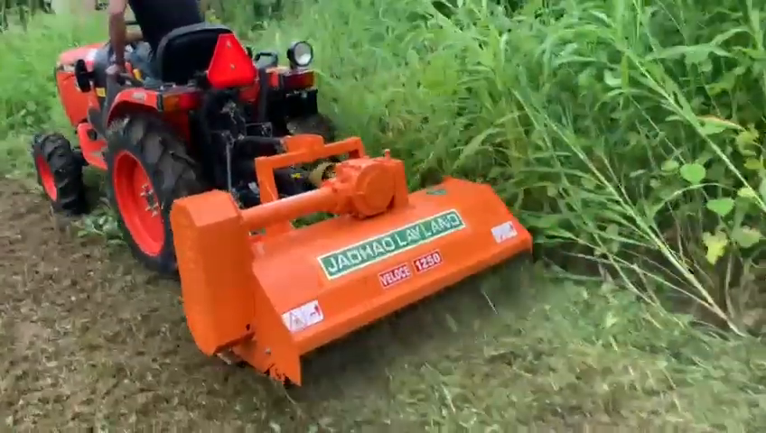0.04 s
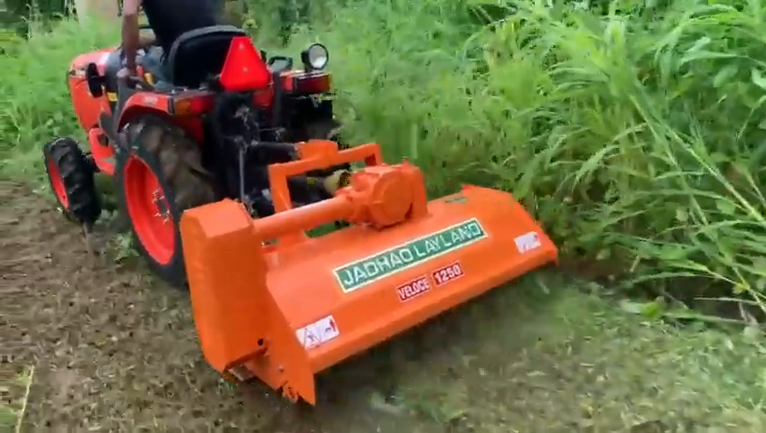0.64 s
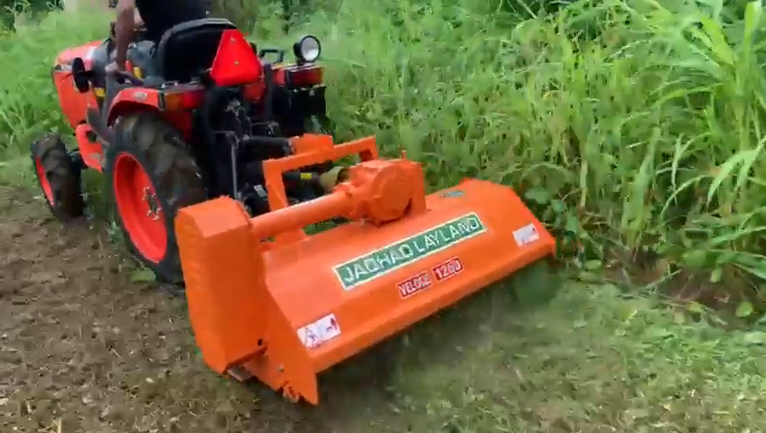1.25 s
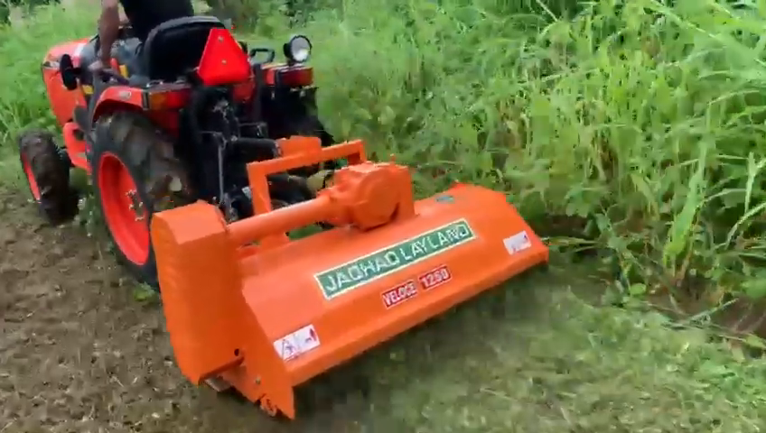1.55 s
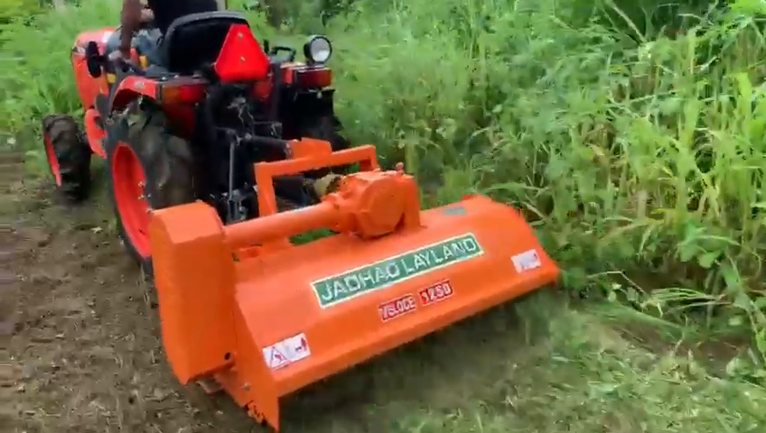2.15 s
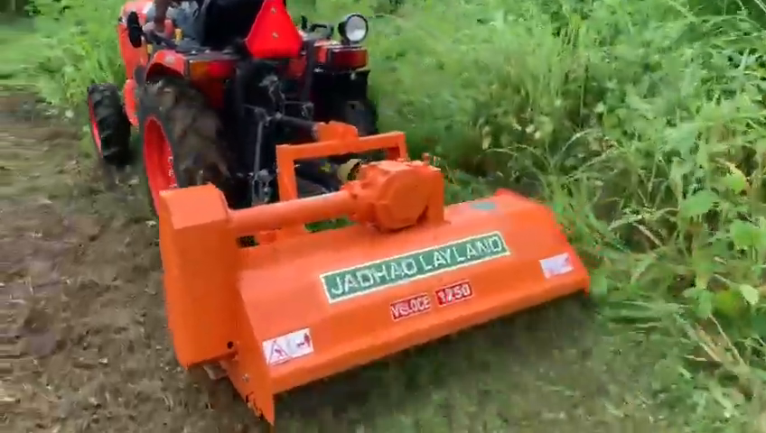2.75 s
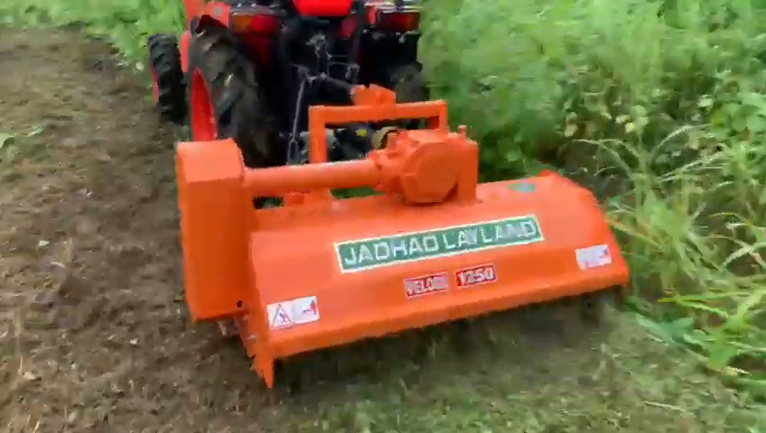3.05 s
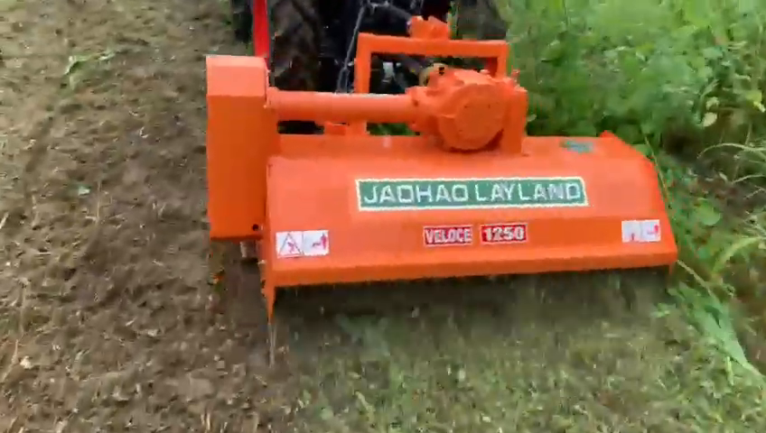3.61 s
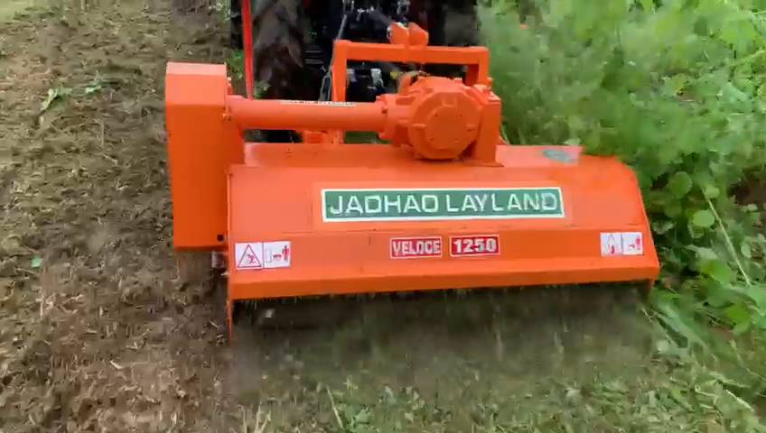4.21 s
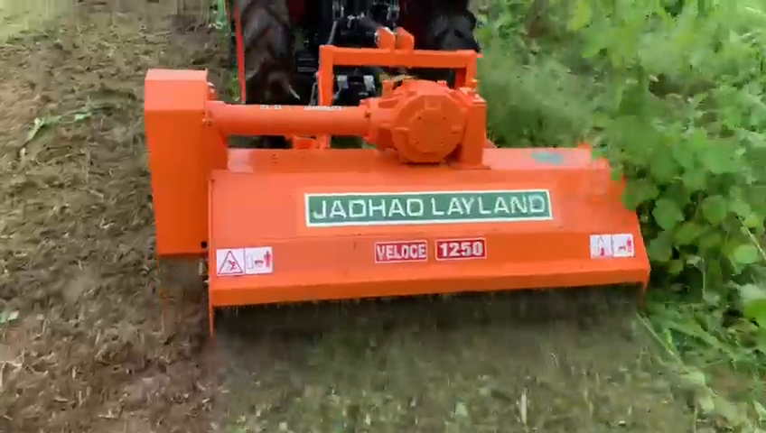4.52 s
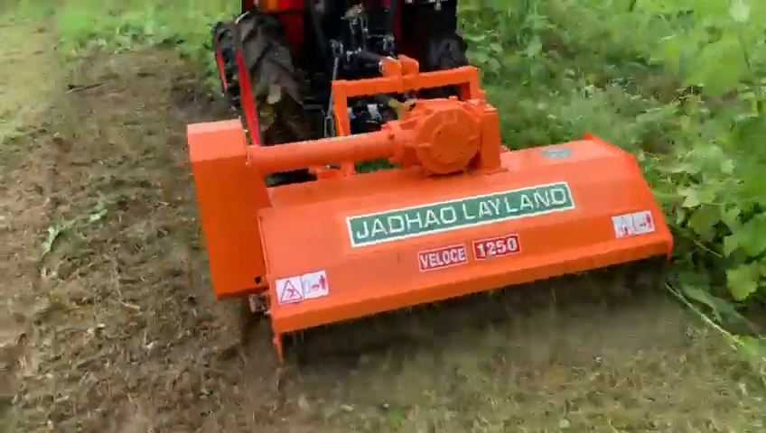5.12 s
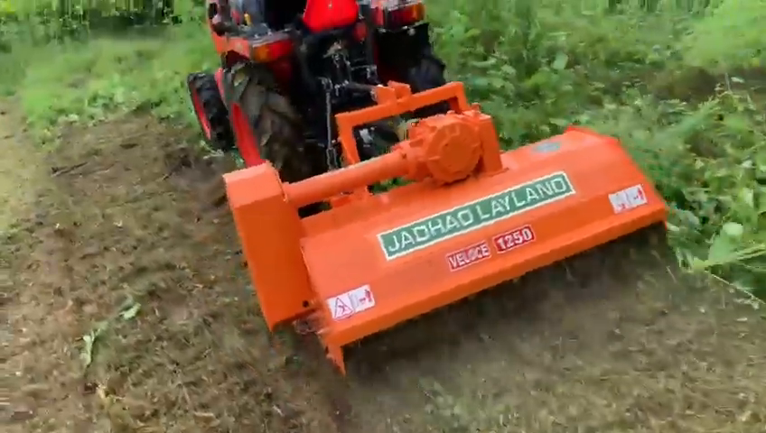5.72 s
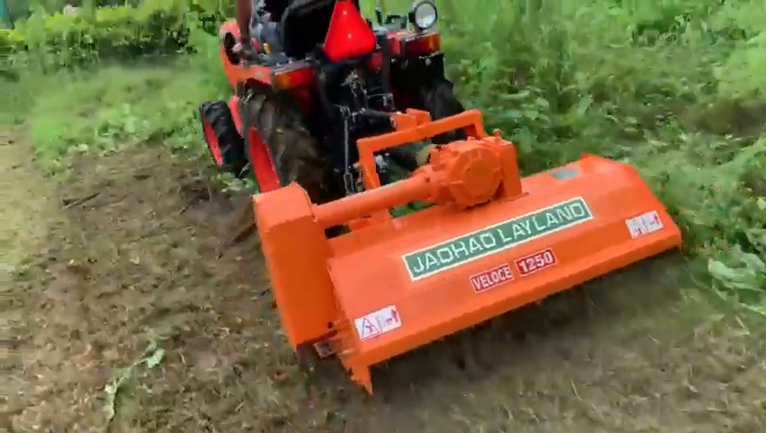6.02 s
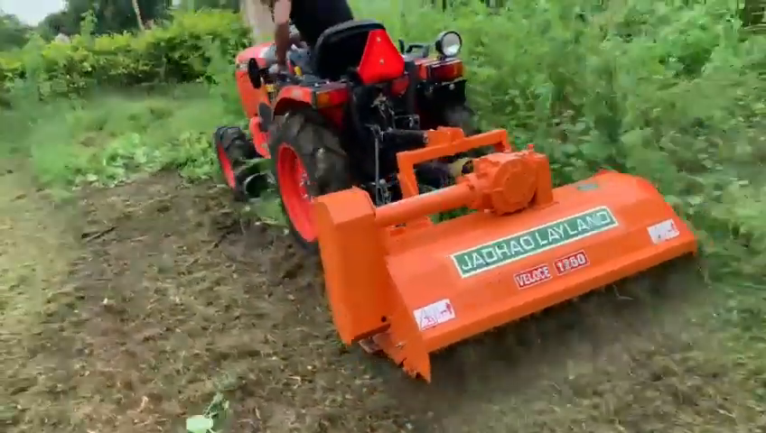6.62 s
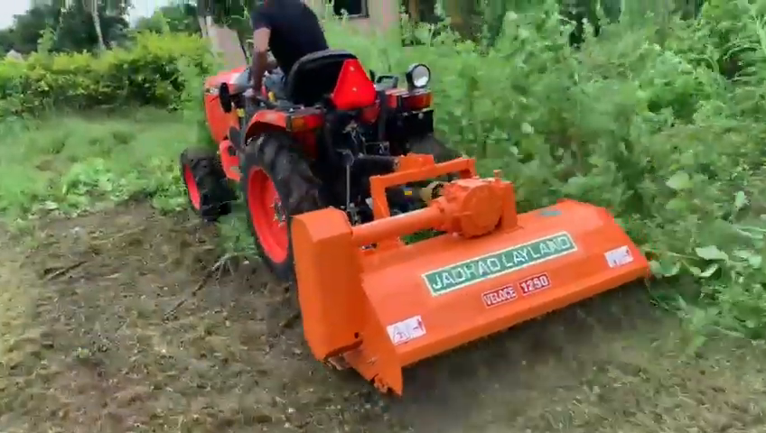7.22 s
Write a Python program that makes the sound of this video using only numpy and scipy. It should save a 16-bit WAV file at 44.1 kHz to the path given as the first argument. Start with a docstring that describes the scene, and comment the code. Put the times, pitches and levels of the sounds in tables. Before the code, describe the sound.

Close by in a field, a flail mower hums and rattles over the steady drone of a diesel tractor. It starts in thick grass, with constant chopping, crunching stalks and sharp ticks on metal, then thins to a lighter leafy hiss. In the last two seconds, a few hollow knocks of earth hit the hood as gusts rumble and thump on the microphone and the machine keeps running.

```python
"""A field of tall grass, a few metres from a small diesel tractor driving a flail mulcher.
Four rows of flails hum under a steel hood, snapping stems and tearing leaves; stalks, stones and clods
strike the steel. The exhaust throbs and the gearbox sings, both geared to the rotor's speed.
In the last two seconds wind buffets the two microphone ports and the drone wavers between them."""
import sys
import numpy as np
from scipy import signal
from scipy.fft import rfft, irfft, next_fast_len
from scipy.io import wavfile
from scipy.ndimage import uniform_filter1d

SR = 44100
rng = np.random.default_rng(int(sys.argv[2]) if len(sys.argv) > 2 else 0)


def dump_mix(stems):
    """Bounce the given channels to the path in sys.argv[1] as a 16-bit WAV at rate SR."""
    frames = np.atleast_2d(stems).T  # one column per channel
    limited = np.clip(frames, -1, 1)  # hard clip at full scale
    pcm = np.round(limited * 32767).astype(np.int16)
    wavfile.write(sys.argv[1], SR, pcm)


N = 320166
TIME = np.arange(N) / SR
FREQS = np.maximum(np.fft.rfftfreq(N, 1 / SR), 1)

# the steel hood's ring under flying stems (pitch [Hz], width [Hz], level [dB])
HOOD_MODES = [(1190, 310, 0), (1338, 120, -1), (1765, 105, 0.5), (1924, 83, -1.5), (2050, 420, -3),
              (2705, 72, -9), (3160, 240, -8.5), (3530, 460, -6), (4630, 250, -9.5)]
# tone colour of snapping stems (frequency [Hz], level [dB])
STEM_COLOUR = [(250, -11), (700, 4), (1000, -5.5), (1300, -3.5), (1900, -1), (2400, 0.5), (3000, -3.5),
               (3900, -5.5), (5400, -6), (7400, -11), (12000, -96)]


def flails(turns, hum_db, drum_db):
    """Four rows of flails push the air four times a turn, a low hum, and drum on the grass."""
    # partials of the drumming (multiple of the rotor rate, level [dB])
    drum_partials = [(2, -4.5), (3, 0.5), (9, -3.5), (10, -8.5), (11, -10), (13, -12.5), (14, -12.5),
                     (15, -13)]
    hum = np.sqrt(2) * np.sin(2 * np.pi * 4 * turns) * undb(hum_db + 0.3 * walk(7))
    return hum + tones(turns, drum_partials, flutter=0.11) * undb(drum_db)


def casing(turns):
    """Rotor overtones, gear hum and belt rasp radiate from the casing, whose walls growl once a turn."""
    # overtones of unevenly worn rows (multiple of the rotor rate, level [dB])
    worn_rows = [(7, -15), (8, -2.5), (12, -12.5), (20, -23)]
    # gear teeth meshing (multiple of the rotor rate, level [dB])
    gear_mesh = [(6.17, -22), (8.31, -2), (18.52, -25.5)]
    # rasp of the belt drive (multiple of the rotor rate, level [dB])
    belt_rasp = [(8.91, -14), (10.86, -17.5), (12.87, -24.5), (17.82, -27), (24.66, -22.5), (25.75, -21.5),
                 (26.73, -22)]
    # wall resonances (pitch [Hz], width [Hz], level per pass [dB])
    walls = [(362.6, 64, 3.5), (498, 86, 1.5)]
    belt_turns = turns + 0.0055 * walk(34)  # the belt slips back and forth, blurring its partials
    drone = tones(turns, worn_rows, flutter=0.15) + tones(turns, gear_mesh, flutter=0.082)
    rasp = tones(belt_turns, belt_rasp, flutter=0.2)
    growl = ring(ring(noise() * stroke(turns, sharpness=1), walls), walls)
    return drone + rasp + undb(-8.5) * spread(growl)


def hood_roar(turns, roar_db):
    """Air and clippings churn under the hood; loose flails rattle much the same way on every turn."""
    # dark body of the roar (frequency [Hz], level [dB])
    roar_colour = [(20, -9), (45, -4), (70, 1), (110, 1.5), (175, 4), (250, 1), (380, -0.5), (540, -2),
                   (780, -8.5), (1000, -9), (1500, -8), (3000, -58)]
    churn = colour(noise() * stroke(turns, sharpness=0.16), roar_colour)
    one_turn = rng.standard_normal(256)
    looped = np.interp(turns % 1, np.arange(256) / 256, one_turn)
    rattle = colour(looped * undb(2 * walk(6.4)), roar_colour)
    return (spread(churn) + undb(-14.5) * rattle) * undb(roar_db)


def grass():
    """Grass feeds in by tufts: its flow, the extra roar and the extra hiss, all in dB."""
    # the grass thins as the tractor turns out of the tall stand (time [s], flow [dB])
    stand = [(0, 0.6), (1.0, 1.16), (1.9, -0.6), (2.3, -3.5), (3.3, -6.5), (4.0, -8), (5.5, -4), (6.15, -3),
             (6.8, -7), (7.15, -5), (7.26, -3.5)]
    # thick tufts load the hood, leafy ones hiss
    # (time [s], half length [s], extra flow [dB], extra roar [dB], extra hiss [dB])
    tufts = [(0.22, 0.096, 1.8, 1, -1), (0.54, 0.24, 1, -0.5, 1), (1.06, 0.2, 2.5, 1.5, 1),
             (1.47, 0.058, 2.5, 2, 0), (1.804, 0.19, 4, 1.5, 0), (2.15, 0.093, 4.5, 3.5, 0.5),
             (2.537, 0.19, 4, 3.5, 2), (3.038, 0.22, 4, 2, 1), (3.607, 0.32, 3, 1, 4.5),
             (4.263, 0.3, 0.5, 1, 3), (5.79, 0.027, 4, -11, -1), (6, 0.11, 2.5, 14, 2.2)]
    stand_db, = curves(stand)
    tuft_db, load_db, leaf_db = sum(np.outer(dbs, bell(s, half_s)) for s, half_s, *dbs in tufts)
    return stand_db + tuft_db, load_db + 0.45 * walk(4.2), leaf_db


def cutting(turns, chop_db, shred_db):
    """The flails snap stems and tear leaves, pulsing gently once, twice and four times a turn."""
    # bright hiss of tearing leaves (frequency [Hz], level [dB])
    leaf_colour = [(1500, -9.5), (4000, -5), (5500, -5), (7300, 1), (7800, 0), (8100, 3.5), (11200, 1.5),
                   (11700, -2), (13000, -30)]
    bite = stroke(turns, 0.026) * stroke(2 * turns, 0.037) * stroke(4 * turns, 0.018)
    feed = bite * undb(0.3 * walk(14))
    stems = colour(snaps(per_s=16000, scatter_db=1) * feed, STEM_COLOUR)
    panels = 0
    for hz, width, db in HOOD_MODES:  # stems land all over the hood, so each mode is struck on its own
        gain = undb(db + 2 * walk(21))
        panels += gain * ring(snaps(per_s=2000, scatter_db=1) * feed, [(hz, width, 0)])
    chop = ground_echo(undb(-4) * stems + undb(-6) * unit(panels), lag_s=0.0032, share=0.47)
    leaves = colour(snaps(per_s=16000, scatter_db=1.5) * feed, leaf_colour)
    return spread(flicker(chop * undb(chop_db) + leaves * undb(shred_db), depth_db=1.61))


def engine(firings, exhaust_db, flow_db):
    """The exhaust throbs at the firing rate, harder under load; each combustion rattles the block."""
    # the exhaust note (multiple of the firing rate, level [dB])
    exhaust_partials = [(1, -3), (2, -3), (3, -16), (4, -10.5), (6, -25.5)]
    # resonances of the engine block (pitch [Hz], width [Hz], level [dB])
    block_modes = [(1184, 100, 35), (1860, 320, -14), (2500, 260, -19)]
    bark = undb(0.73 * uniform_filter1d(flow_db, SR))  # load is the grass flow averaged over a second
    throb = tones(firings, exhaust_partials[:1], flutter=0.049)
    overtones = tones(firings, exhaust_partials[1:], flutter=0.16)
    clatter = ring(noise() * stroke(firings, sharpness=0.81), block_modes)
    return (throb + bark * overtones) * undb(exhaust_db) + undb(-49) * spread(clatter)


def stalks(decay_s):
    """Thick stalks burst in short crackles against the steel."""
    # stalk hits (time [s], relative level [dB])
    hits = [(.5522, -27), (0.9485, -30), (1.158, -20.5), (1.457, -24), (1.5, -26), (1.708, -24),
            (1.731, -26), (1.838, -23), (1.89, -17.5), (2.073, -22), (2.104, -33), (2.152, -26),
            (2.406, -26), (2.553, -28), (2.612, -26), (3.546, -20.5), (4.177, -27), (5.875, -22.5),
            (5.984, -28), (6.033, -24.5)]
    bursts = sum(undb(db) * strike(s, decay_s) for s, db in hits)
    crackle = snaps(per_s=5700, scatter_db=3.5)
    crunch = unit(ring(crackle, HOOD_MODES) + undb(-13) * colour(crackle, STEM_COLOUR))
    return spread(bursts * crunch) * undb(-2)


def bundles():
    """Bundles of stalks drag along one hood panel each: swells of narrow, ringing noise."""
    # scrapes (time [s], panel pitch [Hz], half length [s], level [dB])
    scrapes = [(1.11, 1230, 0.085, -32), (1.48, 1296, 0.023, -27.5), (1.82, 438, 0.14, -27),
               (1.87, 622, 0.52, -34), (3.56, 538, 0.037, -27), (5.765, 513, 0.012, -23),
               (6.035, 1300, 0.011, -32)]
    out, panel_q = 0, 66
    for s, hz, half_s, db in scrapes:
        shape = bell(s, half_s)
        scrape = shape * ring(rng.standard_normal(N), [(hz, hz / panel_q, 0)])
        out += undb(db) * scrape * np.std(shape) / np.std(scrape)
    return out


def clods(decay_s, crack_db):
    """Clods of earth crack against the hood, which answers with a short, hollow knock."""
    # knocks (time [s], level [dB])
    knocks = [(5.664, -19), (5.688, -14.5), (5.987, -28), (6.123, -13.5), (6.616, -19)]
    # dull crumble of earth (frequency [Hz], level [dB])
    earth_colour = [(60, -20), (250, 8), (800, 2.5), (3000, -32)]
    # the hood's deep modes (pitch [Hz], width [Hz], level [dB])
    deep_modes = [(130, 41, 6), (280, 73, 19), (410, 100, 14), (535, 55, 11), (654, 76, 6), (790, 52, -4)]
    out = 0
    for s, db in knocks:
        crumble = strike(s, decay_s)
        earth = colour(crumble * rng.standard_normal(N), earth_colour)
        out += undb(db) * (ring(earth, deep_modes) + undb(crack_db) * earth) * np.std(crumble)
    return out


def stones(decay_s):
    """A flung stone or hard bit of stem pings one panel, which the wet grass damps at once."""
    # pings (time [s], panel pitch [Hz], level [dB])
    pings = [(0.088, 2190, -19), (0.318, 3830, -23), (0.548, 2180, -21), (1.015, 3720, -32),
             (1.067, 4670, -31), (1.108, 3680, -28), (1.198, 3650, -25), (1.775, 3000, -22),
             (1.848, 4100, -25), (1.889, 1720, -22), (2.078, 1400, -23), (2.2, 3960, -24),
             (2.408, 1570, -22), (2.554, 1440, -17.5), (2.615, 2020, -21), (5.951, 2330, -20),
             (6.014, 2260, -24), (6.186, 685, -23)]
    out = 0
    for s, hz, db in pings:
        age = np.maximum(TIME - s, 0)
        out += undb(db) * np.exp(-age / decay_s) * np.sin(2 * np.pi * hz * age)
    return out


def splinters(per_s, low_hz, high_hz, decay_s, scatter_db):
    """Woody splinters tick all over the hood, each with a brief ring at its own pitch."""
    out, age = np.zeros((2, N)), TIME[:SR // 25]
    for when, pitch, size, side in rng.random((int(per_s * N / SR), 4)):
        start = int(when * (N - len(age)))
        hz = low_hz * (high_hz / low_hz) ** pitch
        tick = np.exp(-age / decay_s) * np.sin(2 * np.pi * hz * age)
        gain = undb(scatter_db * size ** 2) * np.sqrt(low_hz / hz)
        out[int(2 * side), start:start + len(age)] += gain * tick
    return spread(unit(out))


def gearbox(turns, cycles_per_turn):
    """The gearbox sings one thin, wavering note that comes and goes as the microphone moves round it."""
    # fader ride of the whine (time [s], level [dB])
    whine_ride = [(0, -44), (1.7, -43), (2.3, -62), (3.3, -55), (3.7, -41), (4.65, -46), (5.05, -43),
                  (5.7, -35), (5.85, -53), (6.55, -38), (6.95, -46)]
    whine_db, = curves(whine_ride)
    return tones(turns + 0.004 * walk(14), [(cycles_per_turn, 0)], flutter=0.26) * undb(whine_db)


def wind_strength(start_s, rise_s, breeze_db):
    """Calm, then a breeze gets up and stays, with gusts on top; in dB."""
    # gusts (time [s], half length [s], strength [dB])
    gust_cues = [(5.5, 0.1, -15), (5.672, 0.047, -14), (6.133, 0.25, -21.5), (6.586, 0.047, -19.5),
                 (6.745, 0.087, -17), (7.147, 0.074, -22.5)]
    breeze = undb(breeze_db) * (1 + np.tanh((TIME - start_s) / rise_s)) / 2
    gusts = sum(undb(db) * bell(s, half_s) for s, half_s, db in gust_cues)
    return 20 * np.log10(np.hypot(breeze, gusts) + 1e-6)


def wind(wind_db):
    """Small eddies hit each port on its own, wide ones cover both; a few big ones thump."""
    # rumble of wind on the ports (frequency [Hz], level [dB])
    rumble_colour = [(20, -32), (45, -3), (75, -2.5), (150, 2), (220, -4), (300, -14), (700, -23.5),
                     (1500, -23.5), (4000, -78)]
    # big eddies, a few swings of pressure each (time [s], pitch [Hz], half length [s], level [dB])
    buffets = [(5.413, 80, 0.03, -20), (5.5, 206, 0.031, -19), (5.566, 75, 0.053, -31),
               (5.676, 140, 0.016, -14), (5.874, 78, 0.036, -24), (5.983, 117, 0.015, -23),
               (6.188, 150, 0.0097, -13), (6.32, 93.5, 0.013, -16), (6.697, 70.1, 0.012, -16),
               (6.912, 82, 0.013, -15)]
    small = noise() * undb(2 * np.array([walk(25), walk(28.2)]))
    wide = rng.standard_normal(N) * undb(3.4 * walk(15))
    thumps = sum(undb(db) * bell(s, half_s) * np.sin(2 * np.pi * (hz * TIME + rng.random()))
                 for s, hz, half_s, db in buffets)
    return colour(small + 0.55 * wide, rumble_colour) * undb(wind_db - 2) + thumps


def windblown(drone, wind_db):
    """In the wind the drone wavers at each port and briefly swings wide, left ahead of right."""
    # stereo swings (time [s], half length [s], phase lead of the left side [rad])
    swings = [(5.723, 0.14, 2), (5.93, 0.094, 1.33), (6.87, 0.07, 1.5)]
    lead = sum(radians * bell(s, half_s) for s, half_s, radians in swings)
    analytic = signal.hilbert(drone, next_fast_len(N))[:, :N]
    widened = np.real(analytic * np.exp(1j * np.array([lead, -lead]) / 2))
    waver = 1 + undb(wind_db + 12.5) * np.array([walk(34), walk(41)])
    return widened * waver


def ground_echo(x, lag_s, share):
    """Sound also arrives off the ground; the path drifts as the microphone moves."""
    late = TIME - lag_s * (1 + 0.0936 * walk(1.67))
    return unit(x + share * np.array([np.interp(late, TIME, port) for port in x]))


def flicker(x, depth_db):
    """Six octave-spaced bands swell and fade, each on its own."""
    spectrum, out = rfft(x), 0
    octaves = np.clip(np.log2(FREQS), 9, 14)
    for centre in range(9, 15):
        band = np.maximum(1 - np.abs(octaves - centre), 0)
        out += irfft(spectrum * band, N) * undb(depth_db * walk(18))
    return out


def spread(pair):
    """Turn two unrelated sounds into left and right of one wide source."""
    # left-right likeness; the hiss at 8-9 kHz is in opposite phase and sounds very wide
    # (frequency [Hz], correlation [-1 to 1])
    likeness = [(280, 0.98), (450, 0.82), (700, 0.72), (1050, 0.65), (1300, 0.77), (1700, 0.1), (2150, 0.5),
                (2900, 0.15), (4150, 0.739), (5200, -0.45), (5600, -0.45), (6400, 0.687), (7300, 0.097),
                (7700, -0.8), (8100, -1), (9050, -1), (9750, 0.011), (10400, 0.99)]
    alike = np.clip(over_hz(likeness), -1, 1)
    mid, side = rfft(pair) * np.sqrt([1 + alike, 1 - alike])
    return irfft(np.array([mid + side, mid - side]), N) / np.sqrt(2)


def tones(phase, partials, flutter):
    """Partials on multiples of a shaft's phase; the weaker ones flutter more for their size."""
    out = 0
    for multiple, db in partials:
        carrier = np.exp(2j * np.pi * (multiple * phase + rng.random()))
        wobble = flutter * undb(db / 2) * (walk(7.2) + 1j * walk(29))
        out += np.real(carrier * (undb(db) + wobble))
    return np.sqrt(2) * out


def snaps(per_s, scatter_db):
    """Dense tiny breaks of very uneven size."""
    hit = rng.random((2, N)) < per_s / SR
    return unit(hit * noise() * undb(scatter_db * rng.standard_normal(N)))


def ring(x, modes):
    """Pass a sound through resonances (pitch [Hz], width [Hz], level [dB]); rms 1."""
    response = sum(undb(db) / (1 + 1j * (FREQS ** 2 - hz ** 2) / (FREQS * width))
                   for hz, width, db in modes)
    return unit(irfft(rfft(x) * response, N))


def colour(x, table):
    """Equalise a sound by (frequency [Hz], level [dB]); rms 1."""
    return unit(irfft(rfft(x) * undb(over_hz(table)), N))


def stroke(phase, sharpness):
    """A smooth swell once a cycle."""
    return unit(np.exp(sharpness * np.cos(2 * np.pi * phase)))


def strike(s, decay_s):
    """An instant attack and an exponential tail."""
    return (TIME >= s) * np.exp(-np.abs(TIME - s) / decay_s)


def bell(s, half_s):
    """A smooth rise and fall around a moment."""
    return np.exp(-((TIME - s) / half_s) ** 2)


def walk(rate_hz):
    """Smooth random drift up to about the given rate; rms 1."""
    return unit(irfft(rfft(rng.standard_normal(N)) * np.exp(-(FREQS / rate_hz) ** 2), N))


def noise():
    """Two unrelated white noises."""
    return rng.standard_normal((2, N))


def curves(table):
    """The columns of a table as curves over time."""
    s, *columns = np.transpose(table)
    return [np.interp(TIME, s, c) for c in columns]


def over_hz(table):
    """A table of (frequency [Hz], value) as a curve over the spectrum."""
    hz, value = np.transpose(table)
    return np.interp(np.log(FREQS), np.log(hz), value)


def undb(db):
    """Decibels to gain."""
    return 10 ** (np.asarray(db) / 20)


def unit(x):
    """Scale to rms 1."""
    return x / np.sqrt(np.mean(x ** 2))


def scene():
    """Rotor, gearbox and engine are geared together; the grass drives chopping, hiss and roar."""
    # the rotor picks up speed, sags a little and recovers (time [s], speed [turns/s])
    rotor_speed = [(0, 41.6), (.85, 43.6), (1.6, 43.55), (2.45, 44.05), (3.3, 43.8), (3.9, 43.3),
                   (4.45, 43.3), (4.9, 43), (5.7, 43.65), (6.15, 42.9), (6.7, 43.6), (7.26, 43.9)]
    # levels of the machine's layers; the roar ducks when the wind arrives
    # (time [s], hum [dB], exhaust [dB], casing [dB], hood roar [dB])
    layer_levels = [(0, -19, -25.5, -29, -26), (1.0, -19, -26, -30.5, -24.5),
                    (1.8, -17.5, -27.5, -26.5, -26), (2.35, -20, -27.5, -28.5, -29),
                    (3.7, -17.5, -25.5, -26, -27), (4.8, -18.5, -25, -26, -26.5),
                    (5.3, -20.5, -27, -23, -30), (5.85, -25, -24, -23.5, -35), (6.05, -23, -26.5, -28, -38),
                    (6.55, -23, -31, -28, -33), (7.0, -24.5, -30, -30.5, -30.5), (7.26, -26, -30, -36, -28)]
    speed_hz, = curves(rotor_speed)
    hum_db, exhaust_db, casing_db, roar_db = curves(layer_levels)
    flow_db, load_db, leaf_db = grass()
    wind_db = wind_strength(start_s=5.28, rise_s=0.024, breeze_db=-23)
    turns = np.cumsum(speed_hz * (1 + 0.001 * walk(5.26))) / SR
    firings = 1.205 * turns
    rotor = flails(turns, hum_db, drum_db=flow_db - 35)
    mulcher = rotor + casing(turns) * undb(casing_db) + hood_roar(turns, roar_db + load_db)
    machine = mulcher + gearbox(turns, cycles_per_turn=22.28) + engine(firings, exhaust_db, flow_db)
    drone = windblown(machine, wind_db)
    debris = stalks(decay_s=0.018) + bundles()
    debris += clods(decay_s=0.0069, crack_db=-13) + stones(decay_s=0.0057)
    cut = cutting(turns, chop_db=flow_db - 28, shred_db=flow_db + leaf_db - 31)
    ticks = splinters(per_s=200, low_hz=1407, high_hz=4610, decay_s=0.004, scatter_db=9.5)
    return drone + cut + ticks * undb(flow_db - 39) + debris + wind(wind_db)


def record(dry):
    """The two ports colour the sound a little differently; the top is cut off steeply."""
    # stereo lean (frequency [Hz], left minus right [dB])
    balance = [(60, -1), (190, -1), (350, 0), (630, .5), (1100, 3.6), (1350, 2), (1750, 3.4), (2100, 1),
               (4200, -0.8), (4800, -2.6), (5900, -2.3), (7300, 0.7), (8000, 0)]
    lean_db = over_hz(balance) / 2
    ported = irfft(rfft(dry) * undb([lean_db, -lean_db]), N)
    top_hz = 11780
    return signal.sosfilt(signal.ellip(12, 0.2, 90, top_hz, fs=SR, output="sos"), ported)


dry = scene()
out = record(dry)
dump_mix(out)
```